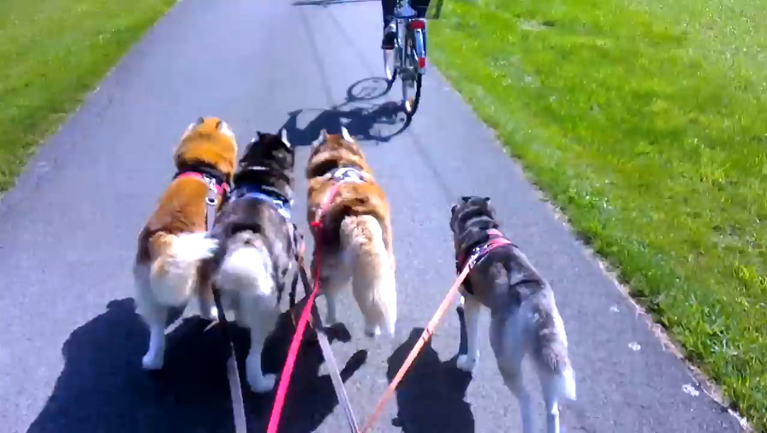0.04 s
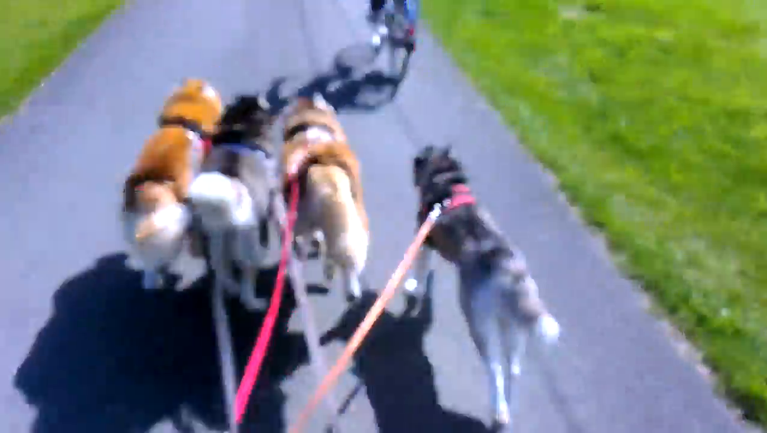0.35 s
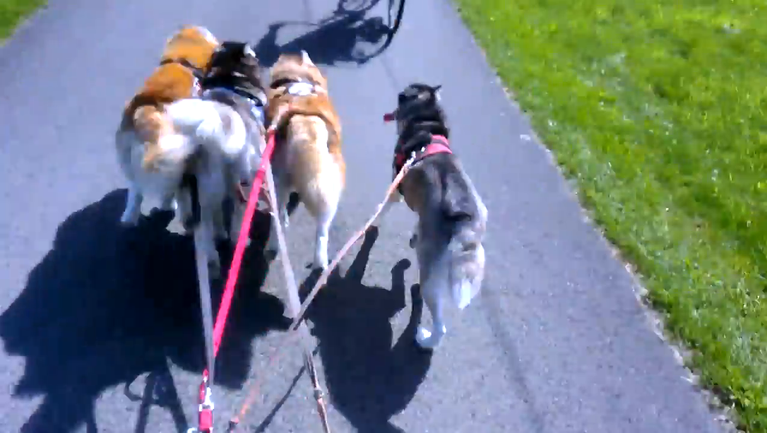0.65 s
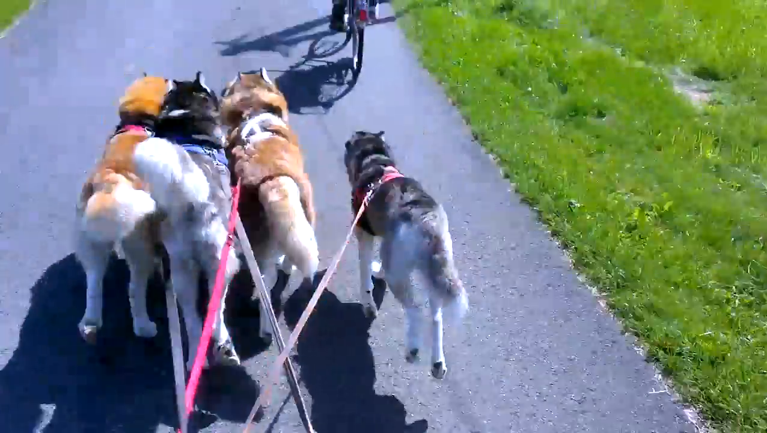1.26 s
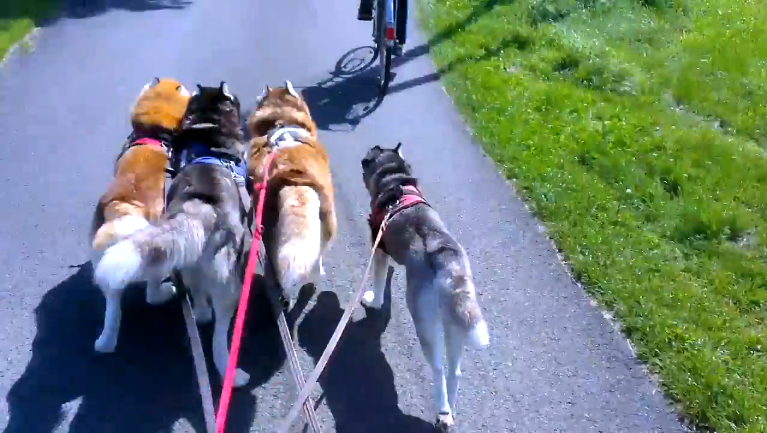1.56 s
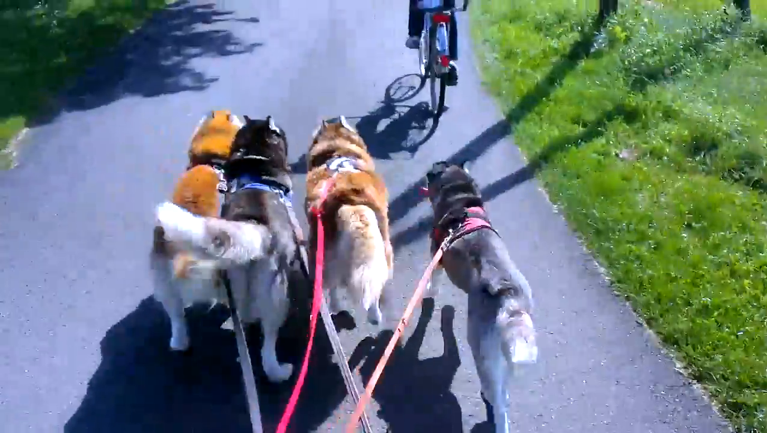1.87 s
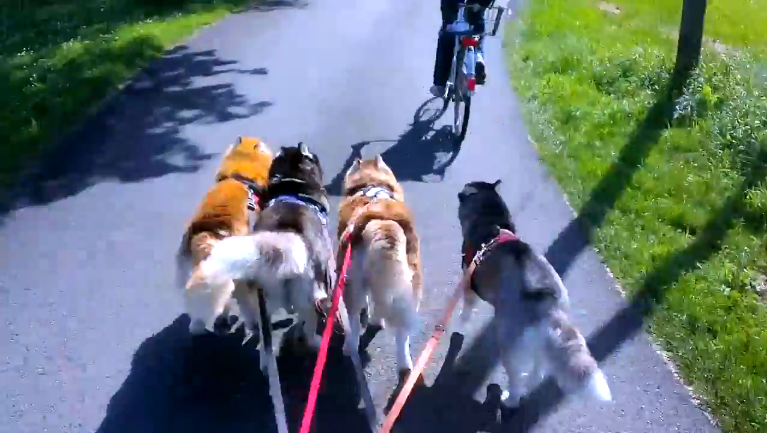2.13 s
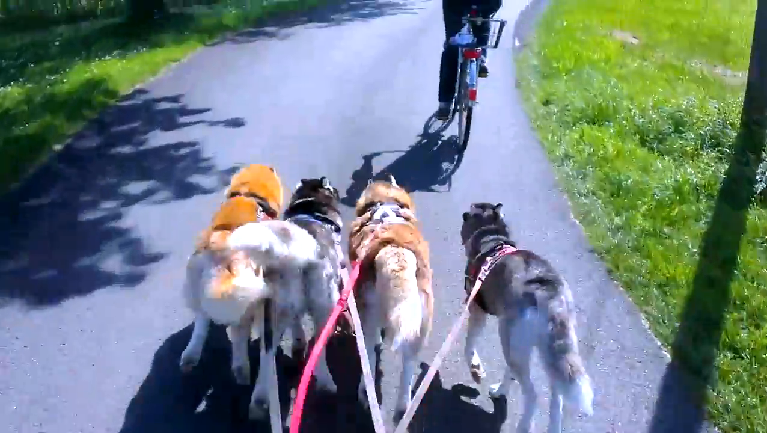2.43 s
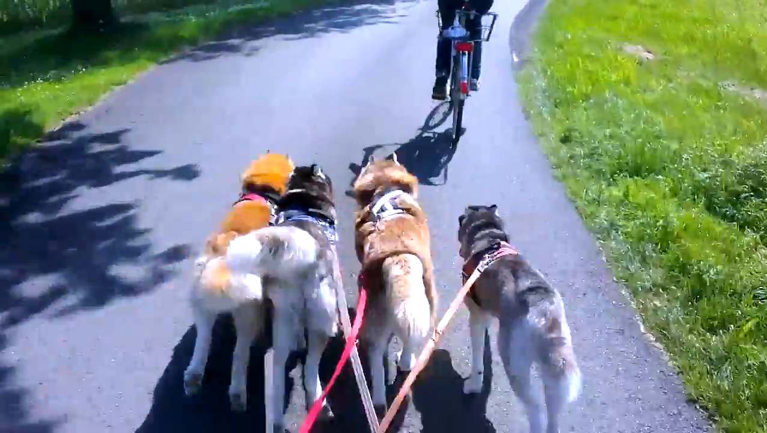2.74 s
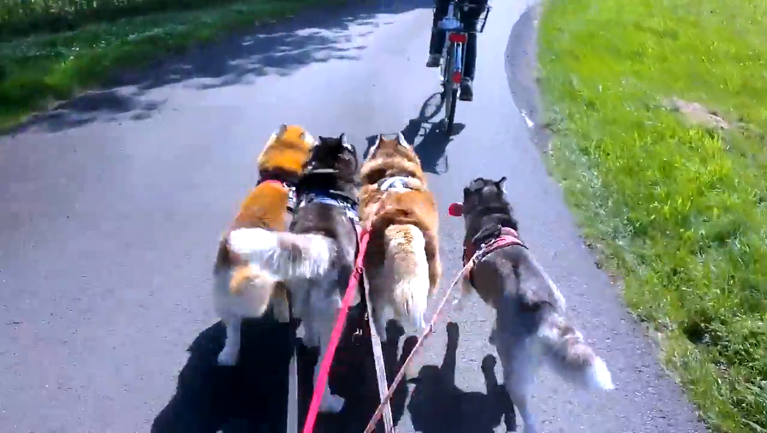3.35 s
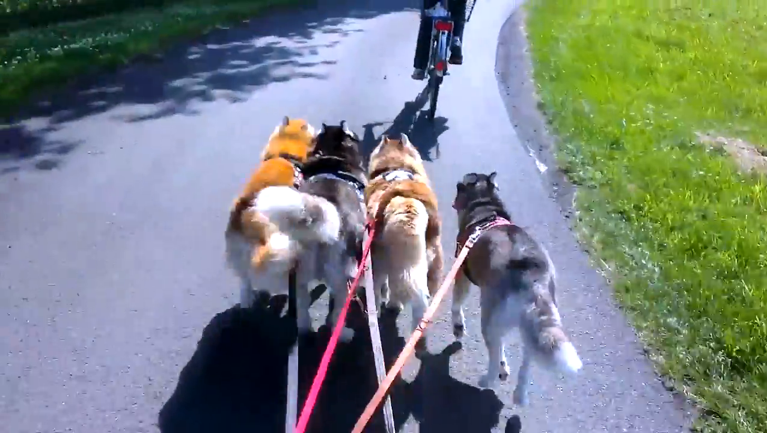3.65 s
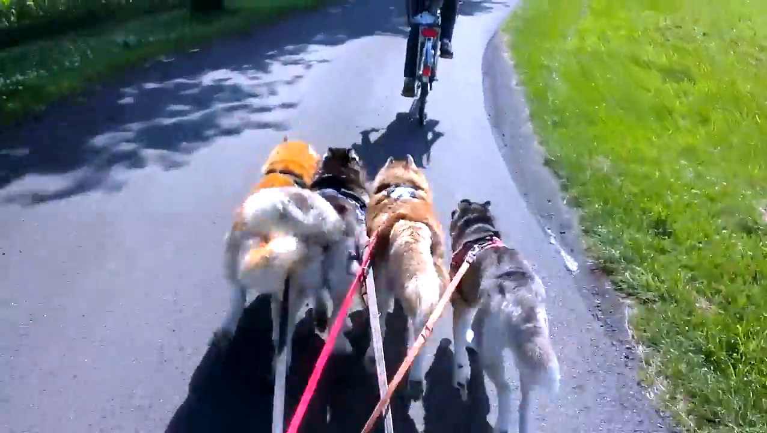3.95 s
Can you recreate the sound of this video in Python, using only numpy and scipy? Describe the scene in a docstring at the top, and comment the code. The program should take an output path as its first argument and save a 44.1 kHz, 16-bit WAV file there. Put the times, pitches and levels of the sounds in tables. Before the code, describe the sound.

Wind rumbles and pops while trotting dogs pull a cart, a harness ring faintly jingling.

```python
"""Wind buffets a microphone in gusts and sharp pops as it rides on a cart pulled by four trotting dogs.
Under the wind, the tyres roll steadily along an asphalt path. Claws tick and scrape on the road,
and the trot shakes a small metal harness ring so that it jingles.
The recorder widens the sound with two short delays."""
import sys
import numpy as np
from scipy import signal
from scipy.fft import rfft, irfft
from scipy.io import wavfile
from scipy.ndimage import uniform_filter1d

SR = 44100
rng = np.random.default_rng(int(sys.argv[2]) if len(sys.argv) > 2 else 0)


def master(y):
    """Save y as 16-bit WAV."""
    cut = np.clip(np.atleast_2d(y).T, -1, 1)
    pcm = np.round(cut * 32767)  # scale
    wavfile.write(sys.argv[1], SR, pcm.astype(np.int16))


N = 176400
TOP_HZ = 15800  # the recorder cuts off anything higher


def undb(db):
    """Turn decibels into a number to multiply by."""
    return 10 ** (np.asarray(db) / 20)


def seconds():
    """The time of each sample."""
    return np.arange(N) / SR


def shape(x, points):
    """Make each frequency louder or softer along a curve of (f/Hz, gain/dB) points."""
    hz, db = np.array(points, float).T
    f = np.maximum(np.arange(N // 2 + 1) * SR / N, 1)
    return irfft(rfft(x) * undb(np.interp(np.log(f), np.log(hz), db)), N)


def colour(x, points):
    """Like shape, but white noise comes out with the same power as it went in."""
    click = np.zeros(N)
    click[0] = 1
    return shape(x, points) / np.linalg.norm(shape(click, points))


def flicker(per_s, depth_db):
    """A gain that glides to a new random value per_s times a second; its average power is 1."""
    step = max(int(SR / per_s), 2)
    drift = uniform_filter1d(np.repeat(rng.standard_normal(N // step + 1), step), step)[:N]
    gain = undb(depth_db * drift / drift.std())
    return gain / np.sqrt(np.mean(gain ** 2))


def swell(at, width, db):
    """A bell-shaped rise and fall; width is the time from its top to 61% of its height."""
    return undb(db) * np.exp(-((seconds() - at) / width) ** 2 / 2)


def spread(mid, side, side_db):
    """Make stereo: add the side sound on the left and subtract it on the right."""
    return mid + undb(side_db) * side * np.array([[1], [-1]])


def wind():
    """Swirls of air rumble on the microphone; strong wind tears into smaller, brighter swirls."""
    # strength of the head wind: t/s, level/dB
    head_wind = [(.06, -41), (.17, -36.5), (.6, -35.5), (.93, -33.5), (1.08, -42.5), (1.45, -39.5),
                 (1.85, -40), (1.97, -32.5), (2.06, -25), (2.19, -26.5), (2.33, -33.5), (2.41, -25),
                 (2.53, -26), (2.6, -35), (2.66, -27), (2.79, -28), (2.92, -38), (3.3, -34.5), (3.6, -38),
                 (3.74, -35.5), (4.0, -35.5)]
    # short gusts: t/s, width/s, level/dB
    gusts = [(0.225, 0.023, -30), (0.303, 0.0084, -23), (0.341, 0.02, -20), (0.386, 0.0058, -20.5),
             (0.525, 0.021, -29.5), (0.695, 0.011, -26), (0.89, 0.007, -30), (0.949, 0.01, -28),
             (2.037, 0.012, -17.5), (2.131, 0.0087, -21), (2.227, 0.02, -28.5), (2.716, 0.0041, -31.5),
             (3.045, 0.027, -30.5), (3.413, 0.027, -28), (3.708, 0.021, -28.5)]
    # tone of the rumble: f/Hz, level/dB
    rumble_colour = [(25, -35), (80, -38), (125, -15.5), (200, -3), (290, 1), (450, -2.5), (650, -10),
                     (1000, -23), (2000, -40.5), (5000, -78)]
    # tone of the smaller swirls: f/Hz, level/dB
    tear_colour = [(300, -32), (550, 3.5), (800, 3.5), (1050, -6.5), (1500, -31.5), (3000, -72)]
    base = undb(np.interp(seconds(), *np.array(head_wind).T))
    strength = np.sqrt(base ** 2 + sum(swell(*gust) ** 2 for gust in gusts))
    rumble = colour(rng.standard_normal(N), rumble_colour)
    rumble /= np.sqrt(uniform_filter1d(rumble ** 2, size=900))  # even out the noise's own swells
    tear = undb(-36) * (base / base.max()) ** 1.5 * colour(rng.standard_normal(N), tear_colour)
    buffeting = np.minimum(flicker(per_s=170, depth_db=2.5), undb(5))
    return (rumble * strength + tear) * buffeting


def tyres():
    """Tyres on rough asphalt make a steady rush that flutters with the surface, and a few scuffs."""
    # tone of the rolling tyres: f/Hz, level/dB
    roll_colour = [(60, -16), (200, 0.5), (450, 3.5), (800, -0.5), (1250, 0.5), (1900, -4), (3100, -11),
                   (4500, -11), (6500, -11.5), (9500, -14.5), (10800, -23.5), (13500, -46.5), (16000, -60)]
    # short scuffs on the road: t/s, width/s, level/dB
    scuffs = [(1.136, 0.016, -38), (3.067, 0.013, -42.5), (3.288, 0.011, -40.5), (3.377, 0.013, -43)]
    # tone of a scuff: f/Hz, level/dB
    scuff_colour = [(800, -9), (1500, 7), (2400, 9), (3500, 0), (5500, 2), (9000, -23), (14000, -47)]
    strength = undb(-39.5) * flicker(per_s=60, depth_db=1.5) * flicker(per_s=7, depth_db=0.57)
    mid, side = (strength * colour(rng.standard_normal(N), roll_colour) for _ in range(2))
    scuffing = sum(swell(*scuff) for scuff in scuffs) * colour(rng.standard_normal(N), scuff_colour)
    return spread(mid, side, side_db=-8.5) + scuffing


def claws():
    """Each step is a short gritty scratch with its own pitch; paws patter between the hard steps."""
    # claws striking and scraping the asphalt: t/s, level/dB, length/s, f/Hz
    hard_steps = [(0.111, -38.5, 0.004, 5200), (0.311, -34, 0.018, 2460), (0.393, -35.5, 0.0055, 5340),
                  (0.477, -39, 0.0045, 8000), (0.573, -39, 0.0066, 6000), (0.705, -30.5, 0.008, 4600),
                  (0.779, -36, 0.0076, 5300), (0.843, -35.5, 0.0065, 6600), (1.166, -37, 0.0046, 10500),
                  (1.195, -38, 0.0039, 6000), (1.541, -42.5, 0.0079, 8000), (1.602, -37, 0.005, 7000),
                  (1.941, -38.5, .004, 6470), (2.014, -37.5, 0.0072, 6000), (2.119, -29, 0.0048, 6350),
                  (2.339, -32, 0.013, 6960), (2.495, -25, 0.0032, 8350), (2.533, -37, 0.0055, 10000),
                  (2.711, -35.5, 0.0034, 6460), (2.847, -32.5, 0.0031, 6650), (3.091, -38.5, 0.0055, 8500),
                  (3.482, -40.5, 0.0042, 7850)]
    # tone of all the scratches: f/Hz, level/dB
    claw_colour = [(500, -17), (1500, 2.5), (3000, -5), (5000, -1), (6400, 0), (8000, -1), (9700, -1),
                   (11000, -11), (13500, -19), (16000, -38)]
    patter_per_s, patter_s, rise_s = 50, 0.0054, 0.00086
    t, out = seconds(), np.zeros((2, N))
    grit = flicker(per_s=2500, depth_db=2.5) * rng.standard_normal((2, N))
    patter = []
    for k, (shift, force, pitch) in enumerate(rng.standard_normal((int(patter_per_s * N / SR), 3))):
        db = -45.5 + 5 * np.clip(force, -2, 1)
        hz = 6400 * 2 ** (0.55 * pitch)
        patter.append(((k + shift) / patter_per_s, db, patter_s, hz))
    for at, db, length, hz in hard_steps + patter:
        part = slice(*np.searchsorted(t, [at, at + 10 * length]))
        age = t[part] - at
        if len(age):
            envelope = (1 - np.exp(-age / rise_s)) * np.exp(-(age / length) ** 2 / 2)
            scratch = undb(db) * envelope * grit[:, part]
            pitched = signal.lfilter(*signal.iirpeak(min(hz, TOP_HZ), Q=2.7, fs=SR), scratch)
            out[:, part] += undb(-3.5) * scratch + pitched
    mid, side = (colour(x, claw_colour) for x in out)
    return spread(mid, side, side_db=-10)


def harness_ring():
    """A loose metal ring bounces after each knock; every touch rings its high tones in a new mix."""
    # knocks that the trot gives the ring: t/s, level/dB
    knocks = [(.137, -43), (.429, -38), (.457, -42), (0.584, -42), (0.811, -52), (0.953, -38.5),
              (1.039, -41), (1.161, -47), (1.197, -48), (1.284, -37), (1.309, -40.5), (1.443, -41),
              (1.585, -42.5), (1.62, -40), (1.65, -40.5), (1.989, -42.5), (2.119, -52), (2.226, -46.5),
              (2.251, -45), (2.287, -43.5), (2.513, -39), (2.578, -49), (2.87, -47), (2.919, -44),
              (2.982, -45), (3.16, -42), (3.186, -39), (3.552, -37), (3.607, -33.5), (3.636, -52),
              (3.805, -43), (3.941, -44.5)]
    # the ring's own tones: f/Hz, level/dB, time to fade by 60 dB/s, pitch scatter as a share of f
    ring_tones = [(7600, -17, .06, .004), (9740, 3, 0.11, 0.0025), (9800, 4, 0.05, 0.0152),
                  (12850, -19, 0.073, .018), (13710, -21, .09, .007)]
    rattle_per_s, contact_s, bounce_s, bounce_db = 11, 0.00086, 0.01, -7
    t, out = seconds(), np.zeros(N)
    chances = rng.standard_normal((int(rattle_per_s * N / SR), 2))
    light_rattle = [(abs(k + shift) / rattle_per_s, -54 + 1.5 * force)
                    for k, (shift, force) in enumerate(chances)]
    for at, db in knocks + light_rattle:
        for touch in range(4):
            part = slice(*np.searchsorted(t, [at, at + .1]))
            age = t[part] - at
            push = undb(db + touch * bounce_db) * (1 - np.exp(-(age / contact_s) ** 2))
            for hz, tone_db, fade_s, scatter in ring_tones:
                detune, mix, phase = rng.standard_normal(3)
                tone = np.sin(2 * np.pi * (hz * (1 + scatter * detune) * age + phase))
                fade = np.exp(-np.log(1000) * age / fade_s)
                out[part] += push * undb(tone_db + 2 * mix) * tone * fade
            at += bounce_s * np.exp(.4 * rng.standard_normal())  # uneven gaps between bounces
    return out


def wind_pops():
    """A big swirl of air pops or thumps on the microphone: the pressure swings once or a few times."""
    # single swirls: t/s, level/dB, f/Hz, width/cycles
    swirls = [(.3045, -16.5, 368, 0.71), (.3243, -4, 530, 0.52), (.3533, -8.5, 755, 0.51),
              (0.3558, -5, 510, 0.52), (.3858, -18, 376, 0.81), (.5231, -18.5, 336, 1.4),
              (0.693, -9, 890, 0.41), (.8959, -21, 356, 0.77), (1.146, -22.5, 298, 0.39),
              (1.9488, -21.5, 410, 1.4), (2.033, -8.5, 390, 0.43), (2.0315, -13.5, 940, 0.4),
              (2.0698, -17.5, 423, 0.94), (2.1476, -18, 431, 0.64), (2.201, -9.5, 320, 0.69),
              (2.3987, -18.5, 337, 1.1), (2.4287, -15, 556, 0.8), (2.5732, -11.5, 553, 0.48),
              (2.689, -18.5, 346, 1.1), (2.7627, -18, 485, 0.35), (2.7963, -20.5, 362, 1.2),
              (2.8287, -19, 313, 0.58), (2.9433, -22, 420, 0.63), (3.0616, -21, 337, 1.1),
              (3.4306, -17.5, 426, 0.55), (3.777, -23.5, 457, 0.79), (3.7827, -12.5, 426, 0.43),
              (3.885, -22.5, 306, 0.57)]
    out = np.zeros(N)
    for at, db, hz, width in swirls:
        cycles = (seconds() - at) * hz
        swing = np.cos(2 * np.pi * cycles + rng.uniform(0, 2 * np.pi))
        out += undb(db) * swing * np.exp(-(cycles / width) ** 2 / 2)
    return out


def scene():
    """Wind, tyres and dogs as heard from the cart."""
    return wind() + wind_pops() + tyres() + claws() + harness_ring()


def record(dry):
    """The recorder widens the sound with two delayed copies and cuts the highest treble."""
    # filter on the first copy: f/Hz, gain/dB
    first_curve = [(60, -7), (140, -1.5), (300, -3), (550, -5), (1000, -8), (2000, -8), (4000, -5.5),
                   (9000, -16)]
    # filter on the second copy: f/Hz, gain/dB
    second_curve = [(1000, -50), (2500, -24), (4000, -17), (7000, -7), (12000, -3.5)]
    first_delay_s, second_delay_s, opening_silence_s = .001633, .004036, .058
    mid = dry.mean(axis=0)
    first = shape(np.roll(mid, round(first_delay_s * SR)), first_curve)
    second = shape(np.roll(mid, round(second_delay_s * SR)), second_curve)
    wide = spread(dry, first - second, side_db=0) * (seconds() > opening_silence_s)
    treble_cut = signal.ellip(8, .2, 70, TOP_HZ, fs=SR, output="sos")
    return signal.sosfilt(treble_cut, wide)


dry = scene()
out = record(dry)
master(out)
```